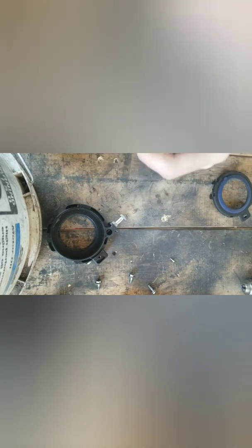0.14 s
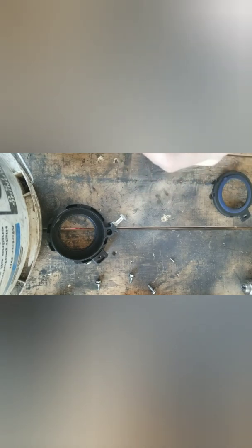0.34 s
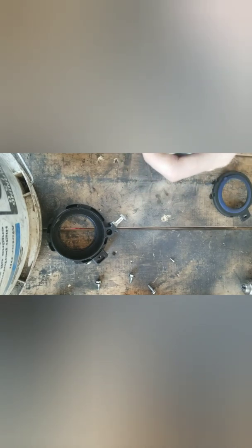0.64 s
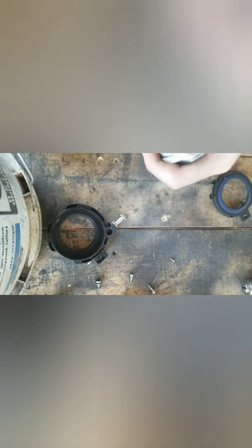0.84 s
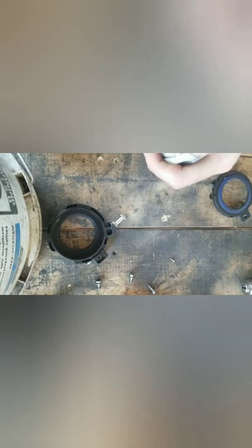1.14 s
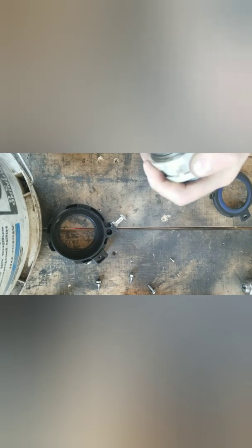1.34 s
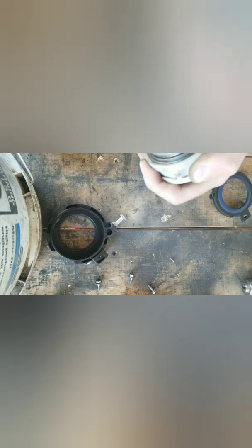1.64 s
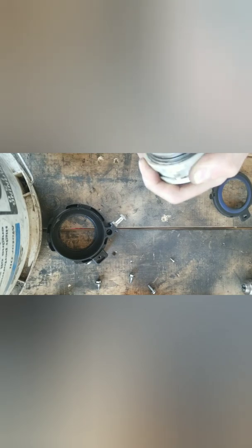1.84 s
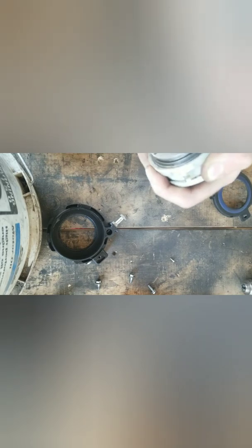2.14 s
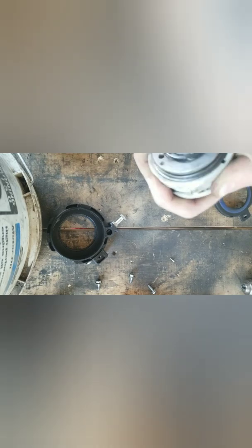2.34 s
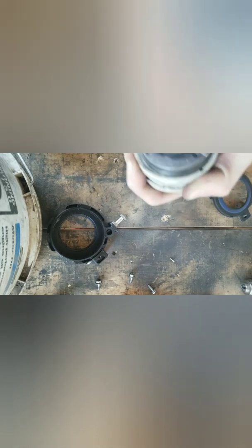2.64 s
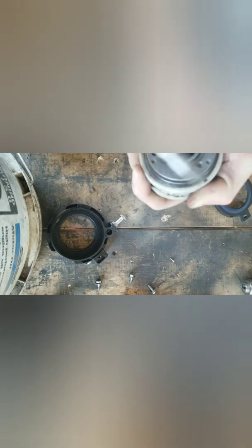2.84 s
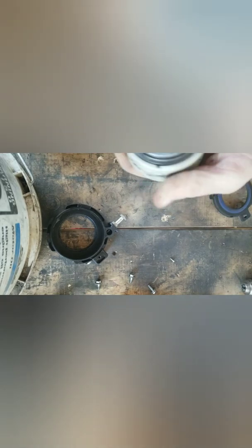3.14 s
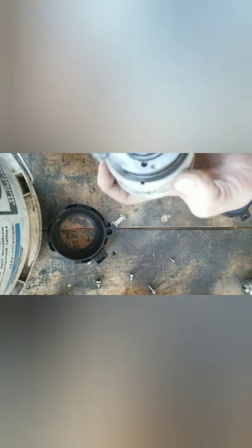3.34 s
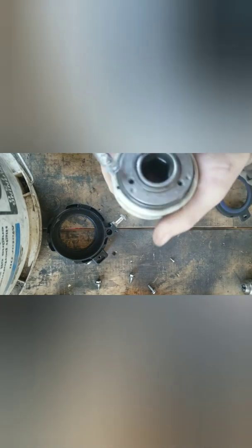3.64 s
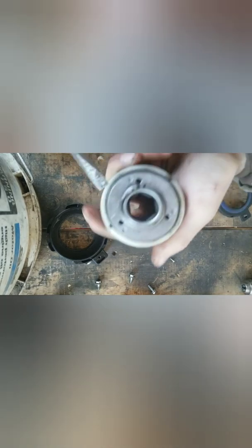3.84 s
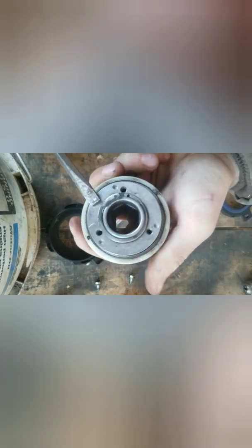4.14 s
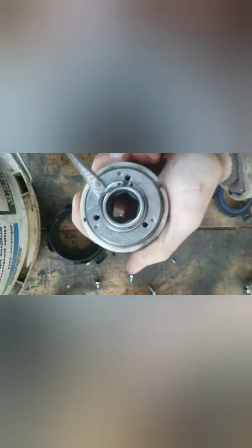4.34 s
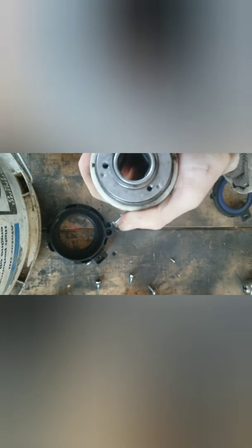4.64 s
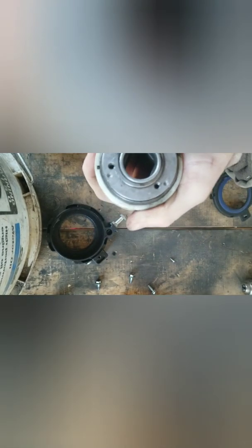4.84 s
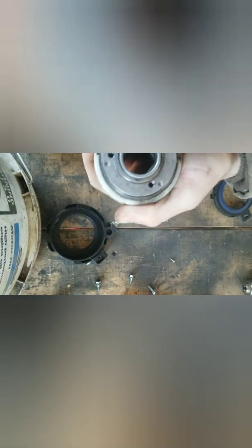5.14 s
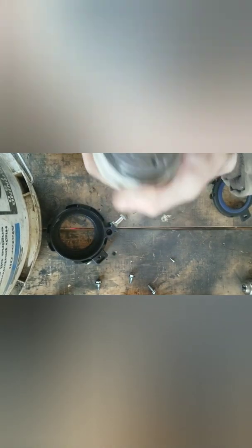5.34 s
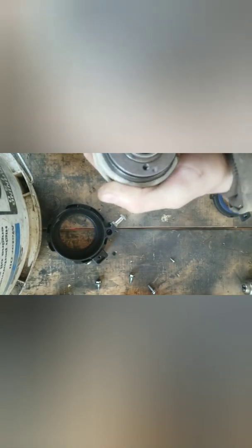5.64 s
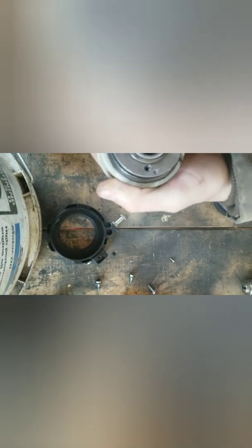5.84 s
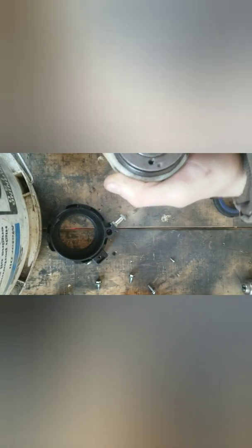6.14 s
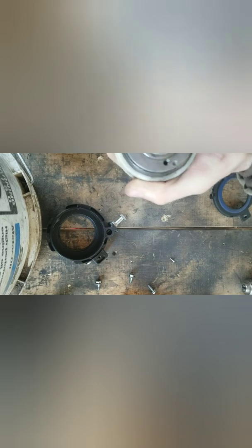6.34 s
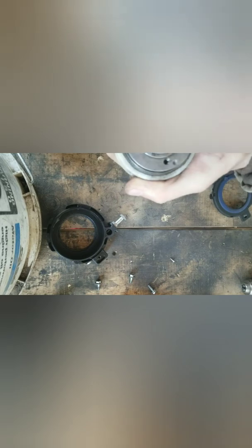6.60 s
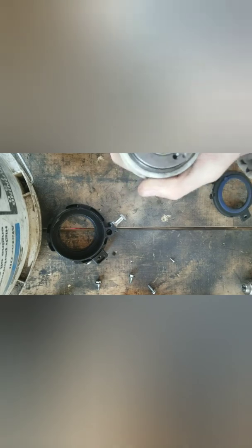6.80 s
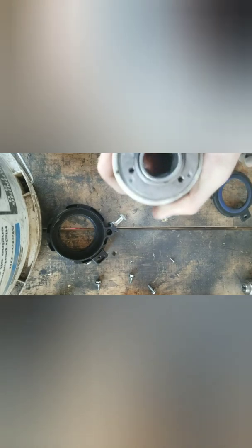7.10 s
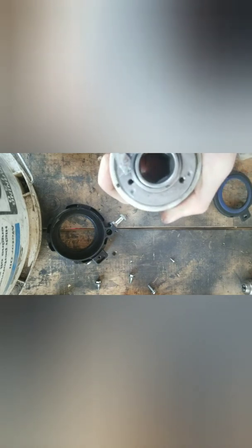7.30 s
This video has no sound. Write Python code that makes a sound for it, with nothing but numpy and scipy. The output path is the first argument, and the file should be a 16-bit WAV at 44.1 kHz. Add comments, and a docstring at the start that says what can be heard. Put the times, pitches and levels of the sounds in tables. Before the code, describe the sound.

A screwdriver blade works at a snap ring on a hand-held steel hub. Quiet skin and cloth rubbing opens, with a faint low motor drone that fades. Small bumps on a wooden bench lead to a hard metallic clatter, then a lull, crisp isolated clicks, and a run of short gritty scrapes. The microphone is close, the room dry and small, the sound leaning right.

```python
"""A screwdriver blade clicks and scrapes on steel as hands turn a metal hub and lever its snap ring.
Each click is a short noise burst; scrapes and the tails after some clicks are chattering noise.
All of these ring through hub, ring and blade. Low decaying swings are the thumps of the wooden bench;
shaped noise is the rustle of skin and sleeve. A soft low drone and a small workshop's echo lie behind.
The sound is louder and brighter on the right."""
import sys
import numpy as np
from scipy import signal
from scipy.fft import rfft, irfft, next_fast_len
from scipy.io import wavfile
from scipy.ndimage import map_coordinates

SR = 44100
rng = np.random.default_rng(int(sys.argv[2]) if len(sys.argv) > 2 else 0)


def put_to_file(sound):
    """Save the sound as 16-bit audio at rate SR, in the file named by the first command-line argument."""
    columns = np.atleast_2d(sound).T  # one column per channel
    safe = np.clip(columns, -1, 1)
    whole_steps = np.round(safe * 32767)
    wavfile.write(sys.argv[1], SR, whole_steps.astype(np.int16))


N = 329155

# "Left over right" in dB: below zero is louder on the right.
# A far motor. Each row: time in seconds, level in dB.
DRONE_LEVEL = [(0, -72), (.6, -69.5), (1.5, -64), (2.4, -62), (2.8, -71), (3.3, -79.5)]
# How fast the workshop echo dies. Each row: frequency in Hz, time to fall 60 dB in seconds.
ECHO_TIMES = [(200, 0.15), (2500, 0.12), (12000, 0.082)]

# Colours of the four hand and bench noises. Each row: frequency in Hz, relative level in dB per Hz.
HISS_COLOUR = [(2650, -14.5), (4500, -2.5), (5730, -2), (6210, -1), (7170, 1.5), (8560, -12), (10600, -8),
               (12300, -3), (15100, -3), (16200, -10.5)]
RUB_COLOUR = [(1060, -25), (1800, -17.5), (2360, -4), (2550, -8), (3440, -5), (4460, -10), (4800, -23.5),
              (6240, -45.5), (10600, -120)]
DRAG_COLOUR = [(140, -3), (230, -5.5), (252, -4.5), (382, -0.5), (492, -5.5), (753, -6.5), (2000, -5),
               (2600, -32), (4400, -120)]
RUMBLE_COLOUR = [(12, -51.5), (20, -9), (36, -1.5), (59, 10), (144, -5), (222, -5.5), (280, -23),
                 (360, -22), (620, -120)]
# How alike left and right are in these noises. Each row: frequency in Hz, likeness (1 is identical).
LIKENESS = [(60, 0.71), (180, 0.75), (550, 0.62), (1650, 0.25), (4970, 0.084), (15000, 0.053)]
# Bench rumble under the shoves. Each row: time in seconds, level in dB.
RUMBLE_LEVEL = [(0.0, -68), (0.87, -68), (0.98, -66), (1.35, -63), (1.66, -65.5), (1.81, -59.5),
                (2.14, -66), (2.43, -57), (2.58, -72.5), (2.83, -73), (3.12, -68), (3.28, -72.5),
                (4.11, -70.5), (4.36, -64), (4.74, -71), (5.4, -65), (5.59, -72.5), (6.3, -74.5),
                (7.02, -59), (7.15, -60), (7.27, -73), (7.46, -63)]
# Hands and sleeve move. Each row: start of full speed in seconds, rise, hold and fall in seconds,
# hiss level in dB, drag level in dB relative to the hiss.
RUSTLES = [(.0, .05, 0.0068, 0.14, -76, -15), (0.105, 0.099, 0.036, .2, -70, -0.5),
           (.45, 0.71, 0.037, 0.31, -70, 4.5), (0.669, 0.028, 0.078, 0.17, -63, 5.5),
           (1.02, .1, 0.0069, 0.15, -66, 4.5), (1.271, 0.16, 0.06, 0.054, -58.5, 2.5),
           (1.428, 0.17, 0, 0.14, -64, 2.5), (1.73, 0.4, 0.031, 0.11, -68.5, -1.5),
           (1.894, 0.072, 0, 0.046, -58, 1.5), (2.266, .2, 0.099, 0.037, -57.5, 3),
           (2.51, 0.21, 0, 0.25, -57, 2.5), (2.941, 0.24, 0.072, 0.21, -63, 0),
           (3.226, 0.24, 0.022, 0.061, -68, -3), (3.47, 0.014, 0, 0.061, -60, -28),
           (3.631, 0.12, 0.018, 0.11, -59, -13), (3.81, 0.11, 0, 0.65, -71.5, -2.5),
           (4.07, 0.062, 0.0023, 0.16, -68, 0), (4.261, 0.091, 0.0068, .25, -72.5, 12),
           (4.494, 0.33, 0.05, 0.39, -65, -3), (4.904, 0.42, 0.043, 0.071, -72, 1.5),
           (5.091, 0.13, 0.11, .4, -62, -3.5), (5.32, 0.028, 0, 0.53, -56.5, -2.5),
           (5.868, 0.074, 0.2, 0.27, -71, -3), (6.32, 0.053, 0, 0.14, -68.5, -25),
           (6.475, 0.038, 0.0092, .13, -63, 1), (6.75, 0.37, 0.012, .3, -81, 8),
           (7.02, 0.32, 0.13, 0.16, -57, 1), (7.31, 0.14, 0.027, 0.065, -70.5, 5.5),
           (7.433, 0.18, 0, 0.09, -74, -1.5)]
REST_DB = (-75.5, -81.5, -81.5)  # hiss, rub and drag while the hands rest
RUB_DB, RUB_PER_DRAG = -3.5, 0.34  # rub in dB relative to the hiss, and dB more for each dB of drag

# Bench thumps. Each row: start in seconds, level of the main swing in dB, pitch in Hz,
# time to fall 60 dB in seconds, left over right in dB.
THUMPS = [(0.9921, -25, 75, 0.061, -2), (1.841, -37.5, 97, 0.055, 0), (1.850, -36.5, 158, 0.01, -3),
          (1.857, -45.5, 210, 0.099, -1), (1.88, -32, 170, 0.028, 0.5), (1.886, -40.5, 321, 0.092, -3),
          (2.351, -42.5, 95, 0.16, 2), (2.508, -31, 60, 0.088, -11), (2.529, -42, 181, 0.063, -4),
          (4.34, -50, 198, 0.052, 0), (4.919, -46.5, 62.4, 0.039, -8), (5.321, -31, 53, 0.075, -12.5),
          (6.489, -41, 72, 0.11, -2), (7.03, -35, 72.4, 0.045, -2), (7.272, -33.5, 75, 0.12, -1.5)]

# Resonances of the steel parts. Each row: centre in Hz, width in Hz (before squaring), relative level in dB.
HUB_MODES = [(1914, 470, -3.5), (2883, 370, 6.5), (2330, 570, -23)]  # the casting
RING_MODES = [(3250, 515, 5.5), (4080, 960, 2), (4700, 140, -2)]  # the snap ring
KNOCK_MODES = [(390, 195, -9), (977, 270, 4), (1450, 1100, -6.5)]  # dull body of the hub in the palm
THUD_MODES = [(767, 1350, -6), (1750, 400, -9.5)]  # the whole hub jolted by a blow
BLADE_MODES = [(6560, 2460, 0)]
TIP_MODES = [(13700, 4300, 11), (14160, 890, -16.5)]
# Scrapes along the groove, and the ringing tails that follow some clicks. Each row: start of full level
# in seconds, rise, hold and fall in seconds, hub level in dB, then snap ring, dull knock and blade levels
# in dB relative to the hub.
SCRAPES_AND_TAILS = [(0, .01, .1, .15, -68.5, -1, -21, -20), (1.1, .1, 0.12, .2, -78.5, 7, -20, -13),
                     (1.45, .1, 0.14, .1, -83, 9, -22, -15), (2.527, 0.012, 0, 0.029, -32.5, -2, -5.5, -1),
                     (2.562, 0.015, 0.011, 0.037, -33.5, -4, -14, -6.5),
                     (2.627, .02, 0.067, 0.58, -64.5, -2, -18, -6),
                     (3.268, 0.076, 0.0015, .02, -71.5, 8.5, 1, 11),
                     (3.558, 0.025, .015, 0.016, -57, -4, -10, -9),
                     (4.072, .001, .05, .2, -68.5, -10, -23, -10),
                     (4.248, 0.027, 0.023, 0.042, -56.5, 1.5, -14, -3),
                     (4.471, .001, 0.0081, 0.017, -50, -3, -3, 9), (4.502, .01, .03, .25, -61, -7, -8, -23),
                     (4.817, 0.047, 0.014, 0.033, -47.5, -3, -11, -10),
                     (4.903, 0.024, 0.015, 0.0097, -46, -5.5, -12, -17),
                     (5.327, .001, 0.03, .06, -38, -1, -11.5, -3),
                     (5.436, 0.023, 0.067, 0.045, -52, -2, -12, -10),
                     (5.518, 0.011, 0, 0.12, -47.5, -5, -8.5, -12),
                     (5.649, 0.035, .004, 0.016, -51, -4, -14, -14),
                     (5.717, .03, 0.083, 0.0069, -50, -7, -9.5, -10.5),
                     (5.867, 0.014, 0.049, 0.018, -47.5, -6, -13, -11),
                     (6.342, 0.027, 0.019, 0.01, -43, -8, -14.5, -14),
                     (6.464, 0.00092, 0.024, 0.007, -43, -6, -10.5, -11.5),
                     (6.91, 0.013, 0.02, 0.041, -38, -5, -5.5, -15),
                     (7.012, 0.029, 0.0094, .04, -46, -5, -6.5, -13),
                     (7.273, .001, 0.0032, 0.0079, -46.5, -2.5, -11, -1.5)]
TIP_DB, TIP_PER_BLADE = -1.5, 1.13  # tip in dB relative to the hub, and dB more for each dB of blade
FADE_DB = 20  # the level changes this much in one rise or fall time
# Blade contacts. Each row: start in seconds, hub level in dB, then snap ring, thud, blade and tip levels
# in dB relative to the hub, time to fall 60 dB in seconds, left over right in dB.
CLICKS = [(0.99, -40.5, -7.5, 6.5, -5.5, -12, 0.022, -2.5), (1.477, -73.5, -2, -15, 14.5, 7, 0.0068, -10),
          (1.8395, -48, -3, -9, -3.5, 0, 0.035, -3.5), (1.857, -66.5, 22.5, 6, -6, -1.5, 0.0075, 1),
          (1.8806, -57.5, 13, 9, 5, -3.5, 0.02, 0), (1.886, -51, 5, 8, 0, 5, 0.014, -4),
          (2.23, -57.5, -1, -2, 29.5, 20, 0.029, 2.5), (2.242, -48.5, 13, 1, 19.5, 27.5, 0.013, -2.5),
          (2.504, -57, 1, 3, 20, 14, 0.019, -8), (2.507, -32.5, 7, -28, 7, 13.5, 0.026, -1.5),
          (2.521, -32, 12.5, 0, -9, 3, 0.018, 4), (2.5301, -24.5, -14, -1, -16, -9, 0.011, 2),
          (2.5632, -24.5, -2, -16, -15.5, -19, 0.0087, 7), (2.5751, -34.5, 10, -24, 6, -18, 0.011, 1),
          (3.1722, -55, 21, 1, 17, 6, 0.015, -5.5), (3.1793, -54, 15.5, -10, 17, 3, 0.021, -4),
          (3.427, -87, 0, 1, -2, 28, 0.02, -9), (3.5411, -58, 4, -11, -5, -5, 0.012, -8),
          (3.554, -43.5, -8, -11.5, -20, -16, 0.014, 3),
          (4.058, -34.5, 2.5, -13.5, -3.5, -9.5, 0.015, -4.5), (4.2451, -52, 4, -10, -12, -17, 0.011, -4),
          (4.273, -46, 3, -6, -13, 0, 0.02, -6), (4.3398, -54, 0, 14.5, -7, -8, 0.018, -9),
          (4.387, -54, 1, 3, -3, -5, 0.012, -1), (4.463, -23, -0.5, -6.5, -4, -6.5, 0.018, -6),
          (4.885, -51, -2, -23, -23, -27, 0.012, -3), (5.0907, -41, 9, -16, -2.5, -4, 0.014, -6.5),
          (5.316, -31.5, 1, -20, 9.5, 13, 0.029, 3), (5.4429, -38.5, -1, -8.5, -7, -34, 0.02, -5.5),
          (5.5224, -31, -7, -41, -8, -29, 0.0059, -0.5), (5.5411, -38.5, -3, -16, -8, -27, 0.019, 1),
          (5.715, -43, -17, -11.5, -23, -26, 0.0053, -4), (5.7359, -41, -19, -15, -17, -22, 0.01, -4),
          (5.9094, -34, -7.5, -0.5, -13, -17, 0.017, 1), (6.1383, -73, -1, -15, 13.5, 5, 0.029, -7),
          (6.4645, -29.5, -10.5, -33, -19.5, -18.5, 0.024, -9.5), (6.4772, -32, -8, -11, -8, -15, 0.011, 9),
          (6.4902, -29, -7.5, -7.5, -15, -9, 0.011, -3), (7.0276, -45, 8, 16, -11, -17, 0.0071, -2),
          (7.2718, -47, 5, -2, -6, 3, 0.012, -4), (7.442, -65, -20, -20, -7, 6, 0.012, -10)]

# The hand shades the left port from the blade. Each row: frequency in Hz, left level in dB.
HAND_SHADE = [(1000, -0.5), (5000, -2), (13000, -2.5)]
# Colour of the two microphone ports. Each row: frequency in Hz, left over right in dB.
PORT_COLOUR = [(60, -5.5), (110, -8.5), (200, -7.5), (380, -5.5), (700, -3.5), (1290, -1), (2380, -2),
               (4400, -6.5), (8120, -11), (15000, -16.0)]
TOP_HZ = 16250  # nothing passes above this


def amp(db):
    """Turn decibels into a plain gain."""
    return 10 ** (np.asarray(db) / 20)


def unit(x):
    """Scale a sound to an average (rms) strength of 1."""
    return x / np.sqrt(np.mean(x ** 2) + 1e-20)


def along(points, hz):
    """Read a value between (Hz, value) points, on a log frequency axis."""
    f, value = np.transpose(points)
    return np.interp(np.log(hz + 1), np.log(f + 1), value)


def curve(rows):
    """Join (seconds, value) points by straight lines, one value per sample."""
    seconds, value = np.transpose(rows)
    return np.interp(np.arange(N) / SR, seconds, value)


def wobble(rate):
    """A smooth random curve with this many random points a second."""
    points = rng.standard_normal(int(N * rate / SR) + 4)
    return map_coordinates(points, [np.arange(N) * rate / SR])


def filtered(x, response):
    """Change the strength and timing of each frequency in x."""
    size = next_fast_len(N + SR // 2)
    hz = np.fft.rfftfreq(size, 1 / SR)
    return irfft(rfft(x, size) * response(hz), size)[..., :N]


def body(modes, power=2):
    """Steep resonances of one part, scaled so that white noise of rms 1 leaves at rms 1."""
    def shape(f):
        total = 0
        for k, (centre, width, db) in enumerate(modes):
            sign = (-1) ** k  # neighbours push in opposite directions
            damping = 1j * f * width
            total = total + sign * amp(db / power) * damping / (centre ** 2 - f * f + damping + 1e-9)
        return total ** power
    strength = np.sqrt(np.mean(np.abs(shape(np.linspace(1, SR / 2, 4096))) ** 2))
    return lambda f: shape(f) / strength


def swells(rows, levels_db):
    """Each row rises, holds and falls at its own levels; the powers of overlapping rows add."""
    step = 8  # work on every eighth sample
    t = np.arange(0, N, step) / SR
    start, rise, hold, fall = np.transpose(rows)[:4, :, None]
    away = np.maximum((start - t) / rise, 0) + np.maximum((t - start - hold) / fall, 0)
    fade = amp(-2 * FADE_DB * np.minimum(away, 5))  # doubled dB, because powers add
    power = amp(2 * np.transpose(levels_db)) @ fade
    return np.repeat(np.sqrt(power), step, axis=1)[:, :N]


def drone():
    """A far motor: a narrow band of noise near 100 Hz that swells, then sinks to a faint level."""
    band = filtered(rng.standard_normal(N), body([(99.6, 18.7, 0)]))
    return amp(curve(DRONE_LEVEL)) * unit(band)


def workshop_echo(x):
    """The room answers with a noise tail in which each frequency dies at its own speed."""
    hz, t, grid = signal.stft(rng.standard_normal((2, SR // 2)), SR, nperseg=256)
    dying = grid * amp(-60 * t / along(ECHO_TIMES, hz)[:, None])
    tail = signal.istft(dying, SR, nperseg=256)[1]
    late = np.pad(x, (150, 0))  # the answer starts 150 samples late
    return signal.fftconvolve(late[None], tail / np.linalg.norm(tail[0]), axes=1)[:, :N]


def rush(colour, grain_db):
    """Stereo noise, coloured and roughened by quick changes of gain; its middle has rms 1."""
    pair = rng.standard_normal((2, N)) * amp(grain_db * (wobble(40) + wobble(300)))

    def spread(hz):
        turn = np.arccos(along(LIKENESS, hz)) / 2  # a wider turn makes left and right less alike
        return amp(along(colour, hz)) * np.array([np.cos(turn), np.sin(turn)])
    mid, side = filtered(pair, spread)
    return np.array([mid + side, mid - side]) / np.std(mid)


def hands():
    """Skin and cloth slide over bench and hub as noise, above the hush of the shop and a bench rumble."""
    levels = [(db, db + RUB_DB + RUB_PER_DRAG * drag, db + drag) for *_, db, drag in RUSTLES]
    moving = swells(RUSTLES, levels)
    hiss, rub, drag = np.hypot(moving, amp(REST_DB)[:, None])
    bright = hiss * rush(HISS_COLOUR, grain_db=1.4) + rub * rush(RUB_COLOUR, grain_db=0.5)
    dull = drag * rush(DRAG_COLOUR, grain_db=1.68)
    rumble = amp(curve(RUMBLE_LEVEL)) * rush(RUMBLE_COLOUR, grain_db=1.3)
    return bright + dull + rumble


def thumps():
    """The bench top gives a few low swings under each shove, with a slap and a hollow note."""
    out = np.zeros((2, N + SR))
    t = np.arange(SR // 2) / SR
    # the swing reaches the two ports out of step
    turn = np.array([[.35], [-.35]]) * np.minimum(t / 0.0048, 1)
    for start, db, hz, t60, pan_db in THUMPS:
        swing = amp(-60 * t / t60) * np.sin(2 * np.pi * hz * t + turn)
        slap = 0.54 * amp(-60 * t / 0.023) * np.sin(2 * np.pi * 2.32 * hz * t)
        hollow = 0.11 * amp(-60 * t / 0.091) * np.sin(2 * np.pi * 330 * t)
        level = amp(db + np.array([[pan_db / 2], [-pan_db / 2]]))
        out[:, round(start * SR):][:, :len(t)] += (swing + slap + hollow) * level
    return filtered(out[:, :N], lambda f: (1j * f / (35 + 1j * f)) ** 2)  # weaken the lowest bass


def steel(drives, dull_modes):
    """Hub, ring, dull body, blade and tip each ring under their own drive."""
    parts = (HUB_MODES, RING_MODES, dull_modes, BLADE_MODES, TIP_MODES)
    return sum(filtered(drive, body(modes)) for drive, modes in zip(drives, parts))


def scrapes_and_tails():
    """Chattering noise drives all the parts, for scrapes along the groove and tails after some clicks."""
    levels_db = [db + np.array([0, ring, knock, blade, TIP_DB + TIP_PER_BLADE * blade])
                 for *_, db, ring, knock, blade in SCRAPES_AND_TAILS]
    levels = swells(SCRAPES_AND_TAILS, levels_db)
    chatter = amp(2.15 * wobble(55) + 1.4 * wobble(250) + 3.46 * wobble(1500))
    common, *own = rng.standard_normal((3, N))  # noise shared by both sides, and each side's own
    rough = unit(chatter * (common + 1.14 * np.array(own)))
    return steel(levels[:, None] * rough, KNOCK_MODES)


def clicks():
    """Each contact grazes for about a millisecond, strikes the parts, and dies quickly."""
    drive = np.zeros((5, 2, N + SR))  # five parts, two sides
    t = np.arange(SR // 10) / SR
    strike = round(.0009 * SR)
    for start, db, *parts_db, t60, pan_db in CLICKS:
        common, *own = rng.standard_normal((3, len(t)))
        burst = (common + 0.31 * np.array(own)) * amp(-60 * t / t60)
        burst[:, :strike] *= .3  # the graze
        burst[:, strike] = 4.44  # the blow itself, one sharp sample
        levels = amp(db + np.array([0, *parts_db]))
        sides = amp([[pan_db / 2], [-pan_db / 2]])
        drive[:, :, round(start * SR):][..., :len(t)] += levels[:, None, None] * burst * sides
    return steel(drive[..., :N], THUD_MODES)


def scene():
    """Add the blade work, its echo, the bench, the hands and the drone."""
    work = clicks() + scrapes_and_tails()
    near = filtered(work, lambda hz: amp([along(HAND_SHADE, hz), 0 * hz]))
    echo = amp(-11.0) * workshop_echo(work.mean(0))
    return near + echo + thumps() + hands() + drone()


def record(dry):
    """The two ports differ in colour and arrival time, and the highest treble is cut off."""
    def ports(hz):
        ratio = amp(along(PORT_COLOUR, hz))
        lead = np.exp(1j * np.pi * hz * 70e-6)  # the left port hears 70 microseconds before the right
        return np.array([ratio * lead, 1 / lead]) * 2 / (1 + ratio)
    coloured = filtered(dry, ports)
    return filtered(coloured, lambda hz: np.clip((TOP_HZ - hz) / 400, 0, 1))


dry = scene()
out = record(dry)
put_to_file(out)
```